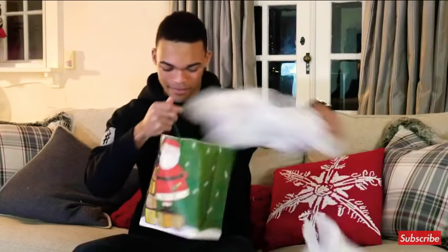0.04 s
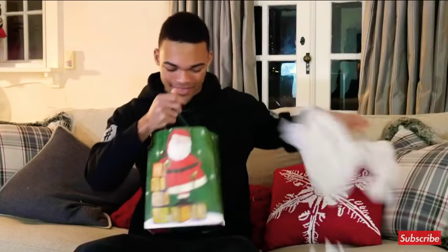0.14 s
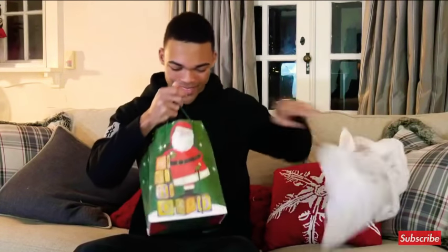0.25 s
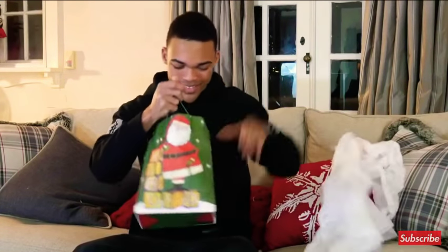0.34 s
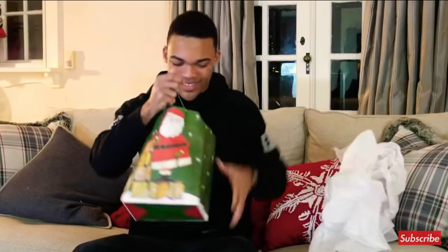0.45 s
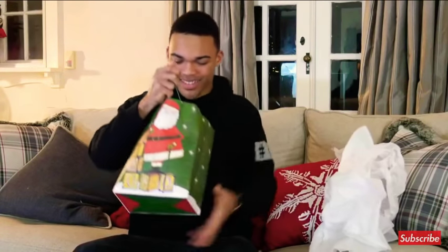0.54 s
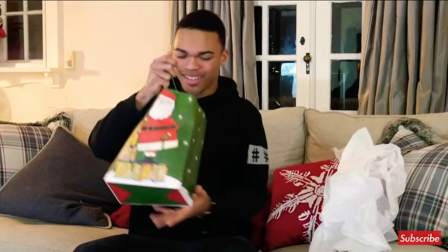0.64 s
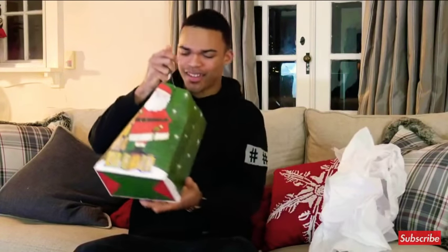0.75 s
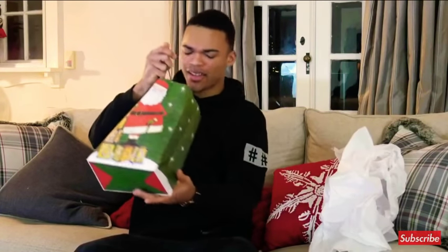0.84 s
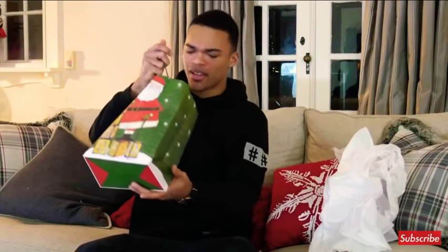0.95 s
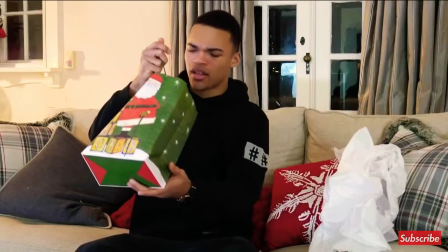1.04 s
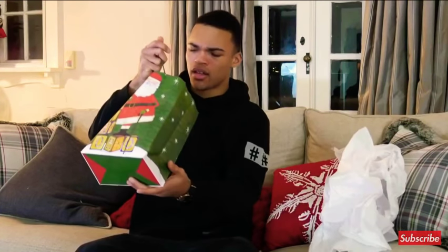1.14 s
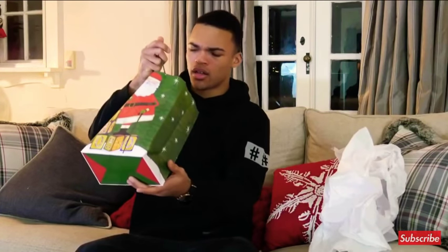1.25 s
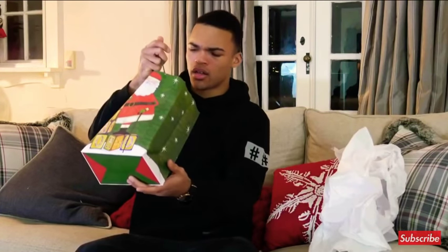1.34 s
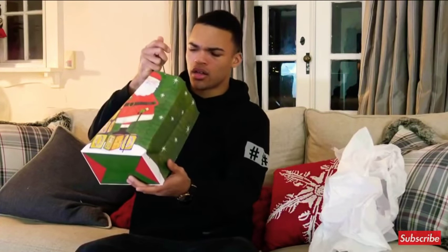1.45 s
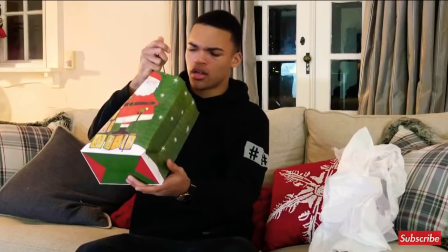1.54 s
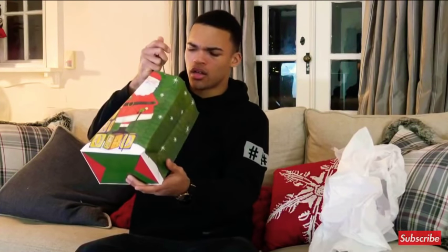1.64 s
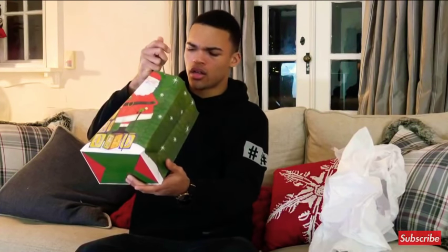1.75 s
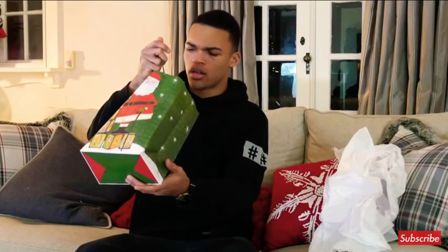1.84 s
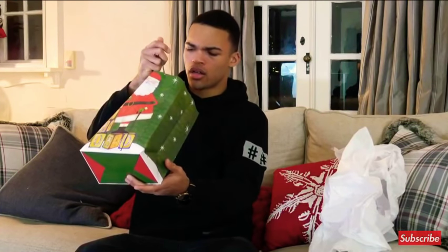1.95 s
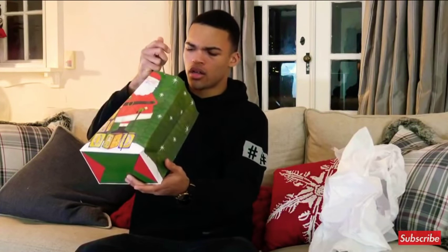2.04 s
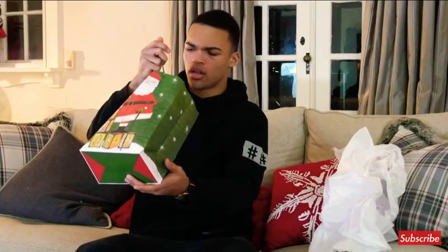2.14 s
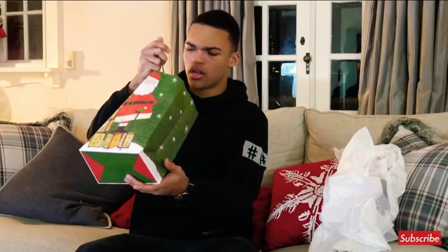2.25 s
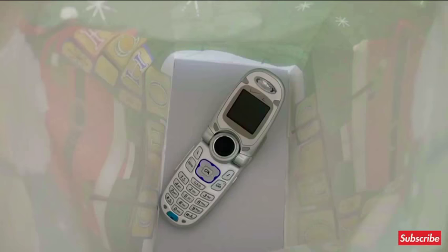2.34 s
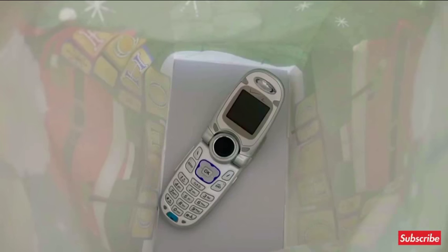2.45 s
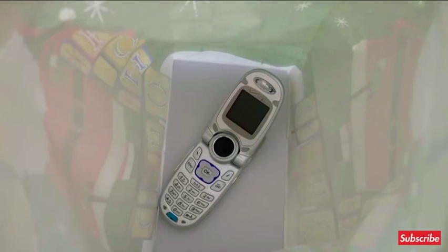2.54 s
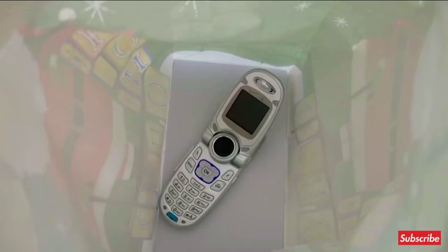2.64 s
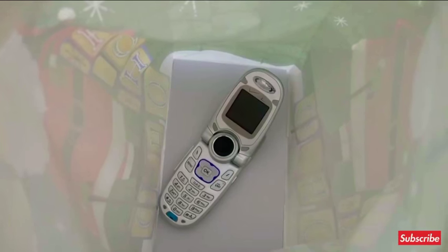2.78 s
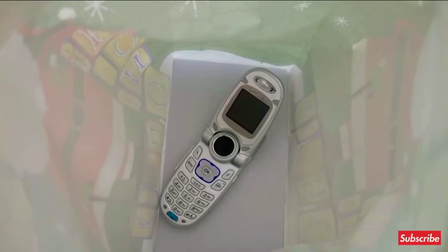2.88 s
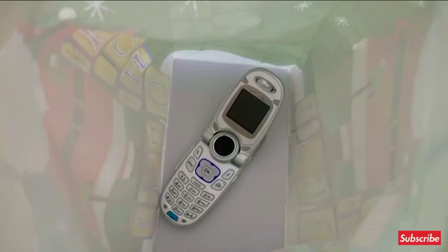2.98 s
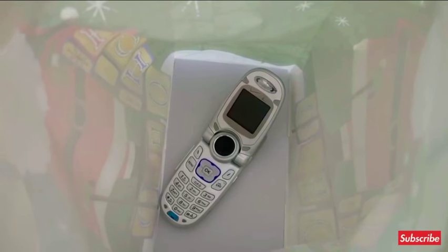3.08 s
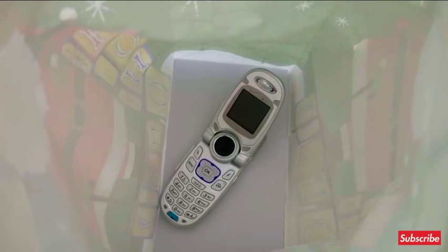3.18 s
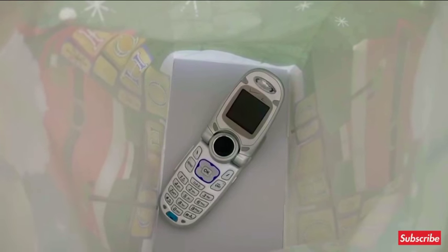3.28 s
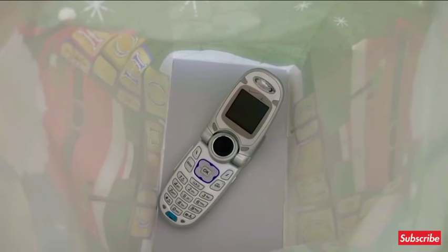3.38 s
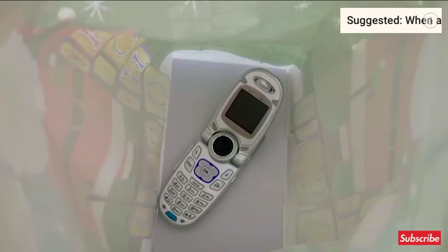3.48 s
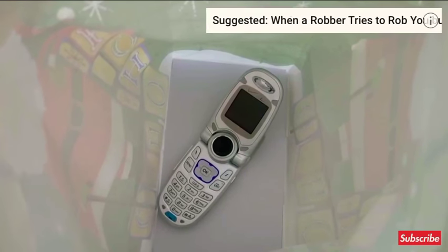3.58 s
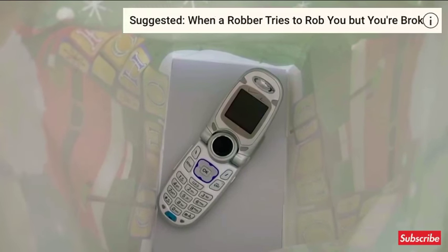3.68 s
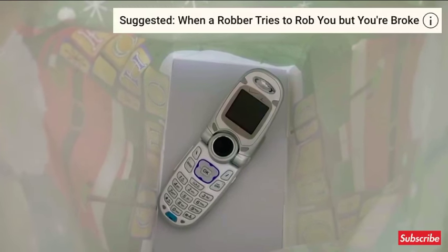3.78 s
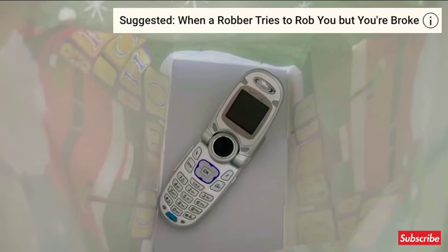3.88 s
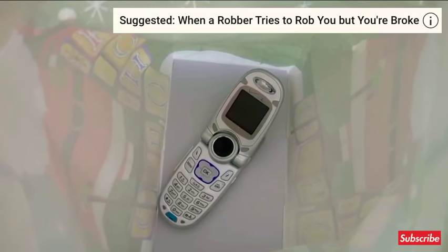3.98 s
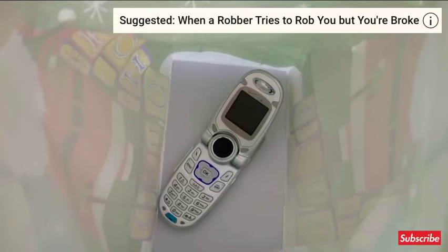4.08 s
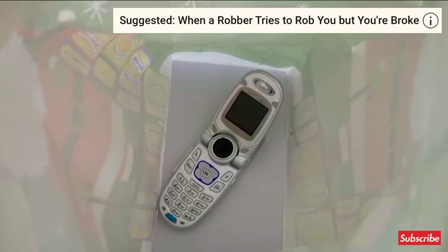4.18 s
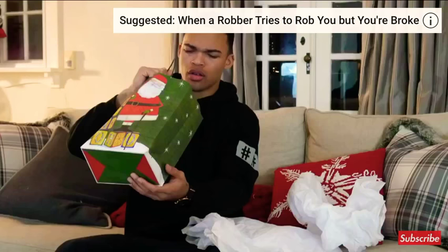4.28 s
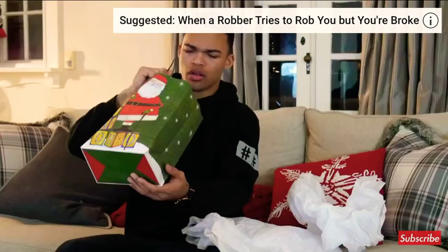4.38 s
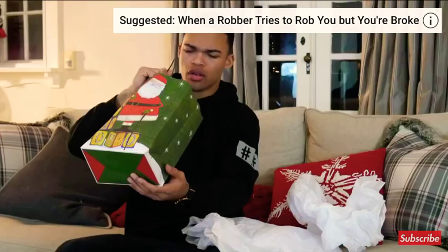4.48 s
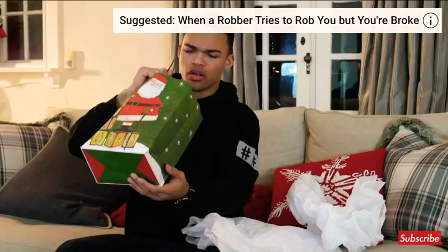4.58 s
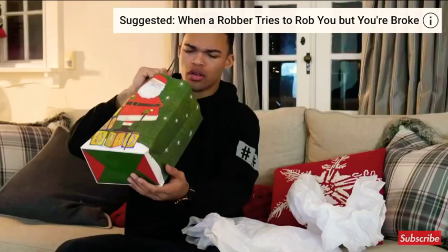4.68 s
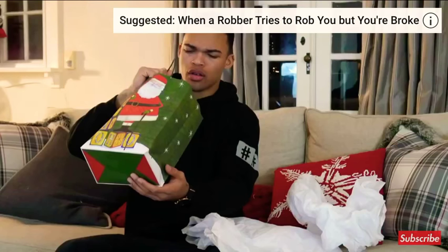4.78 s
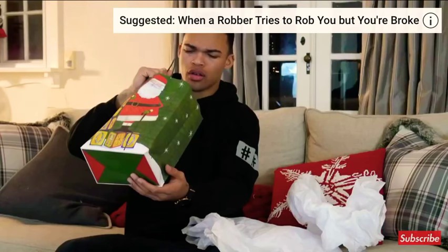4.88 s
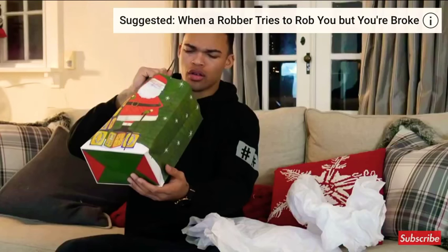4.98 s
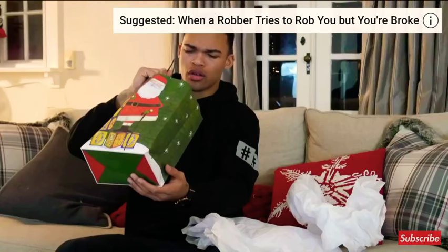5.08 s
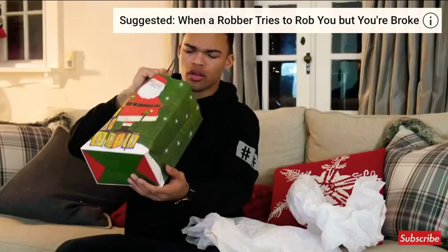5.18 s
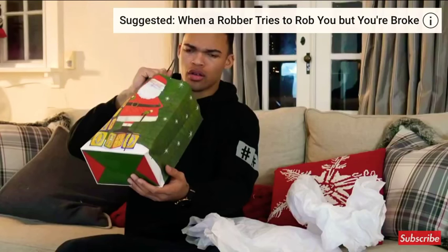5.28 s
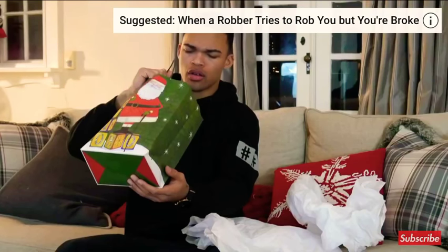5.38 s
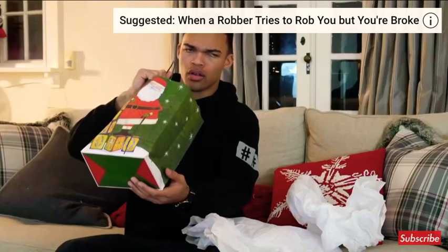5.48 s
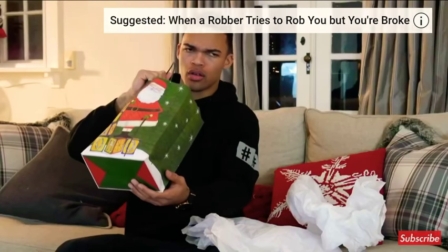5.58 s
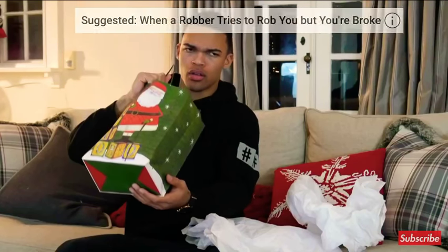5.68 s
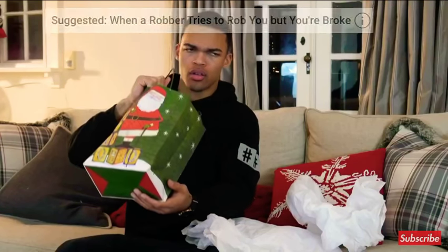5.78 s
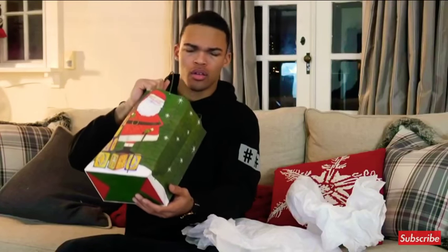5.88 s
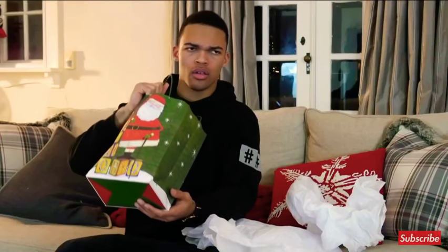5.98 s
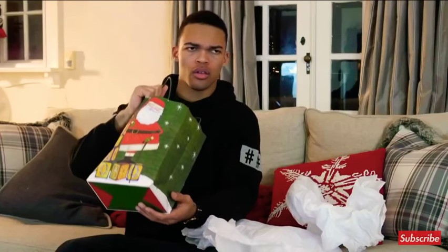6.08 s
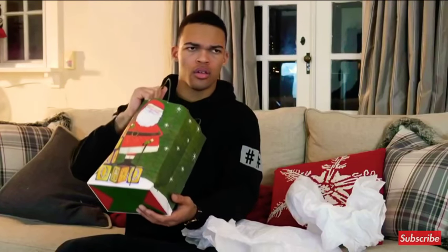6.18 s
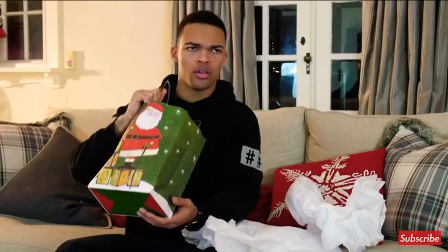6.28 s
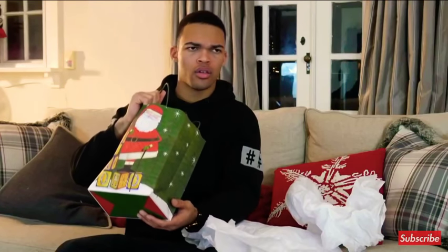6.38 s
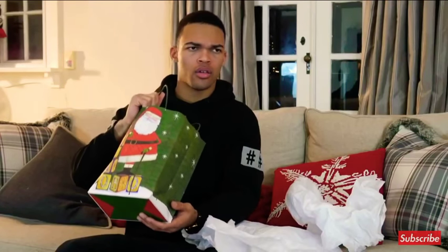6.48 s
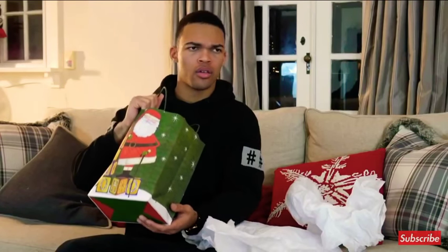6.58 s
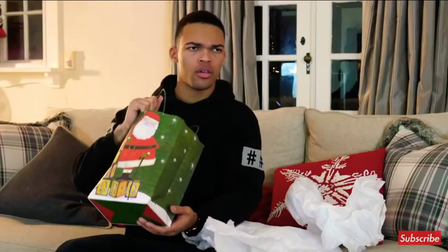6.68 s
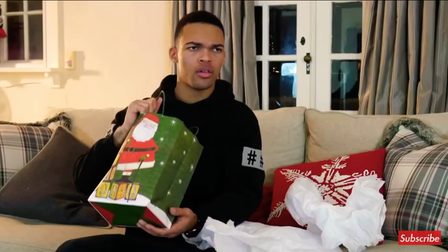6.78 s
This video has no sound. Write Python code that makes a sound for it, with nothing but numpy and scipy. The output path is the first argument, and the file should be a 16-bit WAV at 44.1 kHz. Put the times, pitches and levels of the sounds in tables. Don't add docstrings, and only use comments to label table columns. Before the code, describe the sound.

Loud crisp tissue paper crackles out of a card gift bag, a hand catches the bag, then faint crinkles over a quiet humming room.

```python
import sys
import numpy as np
from scipy import signal
from scipy.fft import rfft, irfft, next_fast_len
from scipy.io import wavfile
from scipy.ndimage import uniform_filter1d, map_coordinates

SR = 44100
rng = np.random.default_rng(int(sys.argv[2]) if len(sys.argv) > 2 else 0)


def bounce(signal):
    frames = np.transpose(np.atleast_2d(signal))
    limited = np.clip(frames, -1, 1)
    pcm = np.round(limited * 32767).astype(np.int16)
    wavfile.write(sys.argv[1], SR, pcm)


def field_ratio(decibels):
    return 10 ** (np.asarray(decibels, dtype=float) / 20)


N = 301203

# [t/s, peak level/dB, f/Hz,
# after-rustle/s]
CREASE_SNAPS = [(0.392, -19, 3630, 0.086), (0.8043, -32, 10300, 0.041), (1.1015, -39.5, 3900, 0.046),
                (1.155, -43.5, 5280, 0.055), (1.2, -48, 3650, 0.051), (1.276, -39.5, 7220, 0.043),
                (1.3217, -36.5, 11100, 0.033), (1.3984, -51, 3650, 0.06), (1.444, -43, 5050, 0.097),
                (1.4711, -43, 6550, 0.053), (1.5423, -40.5, 9900, 0.06), (1.5723, -41.5, 3400, 0.044),
                (1.704, -51.5, 9700, 0.081), (1.747, -41.5, 9970, 0.073), (1.7708, -39.5, 3740, 0.12),
                (1.7894, -45, 3830, 0.06), (1.9948, -46, 4040, 0.054), (2.08, -47.5, 4800, 0.18),
                (2.15, -51, 8600, 0.06), (2.175, -43, 5940, 0.029), (2.2358, -45, 4550, 0.044),
                (2.3064, -50, 4200, 0.06), (2.3277, -47, 9800, 0.091), (2.3998, -48, 7440, 0.06),
                (2.4464, -49, 6650, 0.11), (2.5157, -45, 6950, 0.034), (2.5311, -46, 10200, 0.02),
                (2.5566, -44, 11000, 0.04),
                (2.8462, -45, 10160, 0.06), (3.1053, -45.5, 4000, 0.06), (3.9221, -56, 6960, 0.06),
                  (4.5896, -47, 10000, 0.079), (4.6747, -53, 10400, 0.051), (4.7207, -53, 7080, 0.06),
                  (4.794, -47, 10800, 0.041), (4.817, -55, 3600, 0.06), (5.031, -47.5, 9700, 0.097),
                  (5.134, -53, 6660, 0.046), (5.1774, -49, 6300, 0.034), (5.274, -54.5, 3700, 0.049),
                  (5.3239, -48.5, 9800, 0.021), (5.4231, -45.5, 10800, 0.036), (5.5399, -55, 5670, 0.06),
                  (5.6218, -51.5, 4700, 0.11), (5.8175, -48, 5800, 0.06), (5.8377, -59, 5960, 0.06),
                (5.8845, -45, 5430, 0.032), (5.9034, -46, 10500, 0.035), (5.915, -49, 8120, 0.027),
                  (6.0182, -35, 8400, 0.034), (6.104, -52, 7600, .03), (6.16, -51, 10500, 0.036),
                  (6.253, -44, 5640, 0.037), (6.3744, -43.5, 13100, .03), (6.4308, -46, 7700, .03),
                  (6.4827, -45, 9390, 0.067), (6.5686, -40.5, 11500, 0.013), (6.6548, -42, 9900, 0.034),
                  (6.7394, -52, 5200, .04), (6.759, -45, 4650, 0.044)]
ALL_SNAPS = CREASE_SNAPS
# [t/s, peak level/dB, f/Hz]
FINGER_TICKS = [(1.0095, -42, 2200), (1.022, -31, 1980), (1.2888, -47, 1790), (1.996, -53.5, 1340),
                (3.105, -58, 1750), (3.7304, -60, 1310), (3.922, -58, 2100), (4.5915, -55, 2400),
                (6.2535, -46.5, 2670), (6.7424, -45, 2050), (6.763, -43, 2870)]
# [t/s, level/dB]
HAND_EFFORT = [(0, -30), (.23, -28.5), (.38, -39), (.5, -38), (.63, -42.5), (.77, -53.5), (.86, -45.5),
               (1.09, -59.5), (1.25, -64), (1.73, -72), (2.17, -70.5), (2.57, -70), (4.5, -72.5),
               (5.76, -72.5), (5.9, -63.5), (6.26, -60.5), (6.53, -60), (6.83, -59.5)]
# [f/Hz, level per Hz/dB]
TISSUE_COLOUR = [(710, -43), (1200, -1.5), (1670, -3), (1820, -1.5), (4580, -4.5), (6230, -4.5),
                 (7950, -7.5), (9940, -9), (13500, -13.5), (15200, -18.5)]
CARD_COLOUR = [(35, -53), (60, -29), (150, -3.5), (282, -4), (454, 0), (838, -0.5), (1100, -5),
               (1830, -6.5), (3500, -14), (4550, -24), (7700, -120)]

# [t/s, peak level/dB, rattle/s]
TUG_BLOWS = [
    (0.001, -26, 0.022),
    (0.036, -24, 0.024),
]
# [t/s, peak level/dB, rattle/s]
CATCH_BLOWS = [
    (0.579, -28.5, 0.028),
    (0.614, -23, 0.041),
]
# [t/s, peak level/dB, rattle/s]
SHIFT_BLOWS = [
    (0.855, -35, 0.02),
    (0.959, -42.5, 0.027),
    (1.009, -33, 0.02),
    (1.469, -53, 0.017),
]
# [t/s, peak level/dB, rattle/s]
KNOCK_BLOWS = [
    (4.816, -38.5, 0.04),
    (5.298, -56.5, 0.03),
    (5.834, -55, 0.026),
]
# [f/Hz, level per Hz/dB]
CATCH_COLOUR = [(88, -47), (150, -14.5), (342, -9), (580, -7.5), (646, -2.5), (882, -2.5), (1070, -4),
                (1140, -15), (1270, -4), (1640, -5.5), (1960, -13), (2600, -12), (3800, -20.5), (4940, -19),
                (8360, -120)]
SHIFT_COLOUR = [(71, -41), (120, -4), (272, -9), (358, 2.5), (435, -9), (627, 1), (916, -3.5), (973, -3.5),
                (2140, -10), (2530, -19), (4500, -22.5), (5850, -48), (9900, -120)]
KNOCK_COLOUR = [(71, -60), (120, -32), (243, -5.5), (559, -3), (658, 2.5), (726, 1), (815, -12.5),
                (1020, -1.5), (1290, -14), (1730, -8.5), (2040, -16.5), (2400, -16), (6000, -44.5),
                (7800, -67), (13200, -120)]
# [f/Hz, level/dB, t60/s]
BAG_MODES = [(360, -3, 0.17), (545, -16, 0.22), (650, -6.5, 0.12), (727, -1, .3), (999, -2.5, 0.17),
             (1230, -18, .2), (1720, -9, 0.094), (1880, -22, .15), (2350, -3, 0.11)]

# [delay t/s, level/dB]
WALL_ECHOES = [(.0065, -2.5), (.013, -11), (.0205, -14), (.028, -14)]
# [f/Hz, t60/s]
ROOM_DECAY = [(200, 0.69), (600, 0.43), (1500, 0.33), (4000, 0.32), (12000, 0.035)]

# [f/Hz, level/dB]
MACHINE_LINES = [(118.4, -77), (236.9, -70.5), (263.8, -67.5), (360.7, -72.5), (409.1, -82.5),
                 (769.8, -104), (839.8, -78), (936.7, -85), (979.8, -83)]
MOTOR_LINES = [(84, -78), (106, -79), (121, -74.5), (142, -72.5), (168, -82), (188, -77), (226.5, -75.5),
               (250, -76), (268, -72.5), (293, -91), (310, -73.5), (331, -71), (350, -88), (483, -101),
               (810, -81), (930, -78), (1022, -88.5)]
# (f/Hz, width/Hz, level/dB)
BEARING_WHINE = (2640, 110, -81.5)
# [f/Hz, level per Hz/dB]
USUAL_AIR = [(15, -52), (25, -30), (104, 0), (187, -9), (258, -5.5), (311, -8), (365, -8.5), (441, -10),
             (625, -16), (934, -9), (1220, -25.5), (2590, -21), (3770, -34), (10700, -36), (15200, -31)]
OTHER_AIR = [(15, -70), (25, -13), (48, -36), (75, -8.5), (203, -7.5), (320, -1), (441, -20), (478, -13),
             (714, -22), (795, -11.5), (960, -16.5), (1130, -24.5), (2590, -28), (3380, -30),
             (15200, -37.5)]
# [t/s, share of the other moment]
OTHER_MOMENT = [
    (2.559, 0),
    (2.58, 1),
    (4.48, 0.84),
    (4.5, 0),
]

# (f/Hz, width/Hz, level/dB)
MIC_PEAK = (10400, 1840, 4.64)
# (f/Hz, width/Hz, depth 0-1)
MIC_DIP = (7900, 100, 0.62)


def paper():
    crackle_db, flex_db = effort()
    thin = 0.58 * crinkle(count=14000, low_hz=2220, high_hz=15800, spread_db=1.5, cycles=1.15, size=80)
    thin = patchy(thin + 1.46 * rng.standard_normal(N), depth_db=0.5)
    thin = field_ratio(0.62 * wobble(60)) * thin
    gentle = np.clip((-41.5 - crackle_db) / 15, 0, 1)
    apart = crinkle(count=2200, low_hz=3050, high_hz=15300, spread_db=4.5, cycles=2.0, size=120)
    thin = thin + 0.5 * gentle * apart
    stiff = 0.5 * crinkle(count=6000, low_hz=295, high_hz=3500, spread_db=-1.0, cycles=2.1, size=256)
    stiff = patchy(stiff + 1.28 * rng.standard_normal(N), depth_db=1.2)
    stiff = field_ratio(1.2 * wobble(35)) * stiff
    tissue = field_ratio(crackle_db - 0.03) * tinted(thin, TISSUE_COLOUR)
    card = field_ratio(flex_db - 3.0) * tinted(stiff, CARD_COLOUR)
    return tissue + card


def effort():
    hands = field_ratio(2 * curves(HAND_EFFORT, -140)[0])
    after = dying([(s, db, fade) for s, db, hz, fade in ALL_SNAPS])
    jolts = dying([(s, db - 8.5, 0.077) for s, db, rattle in TUG_BLOWS + CATCH_BLOWS])
    t = np.arange(N) / SR
    present = (t < (OTHER_MOMENT[0][0] + OTHER_MOMENT[1][0]) / 2) | (t > OTHER_MOMENT[2][0])
    tissue = hands + field_ratio(2 * -20) * after
    card = field_ratio(2 * -1.5) * hands + field_ratio(2 * -26.5) * after + jolts
    return [10 * np.log10(present * power + 1e-14) for power in (tissue, card)]


def dying(events):
    out, t = np.zeros(N + SR), np.arange(SR // 2) / SR
    rise = 1 - np.exp(-t / 0.0023)
    for s, db, fade in events:
        out[round(s * SR):][:len(t)] += rise * field_ratio(2 * (db - 10 * t / max(fade, 1 / 200)))
    return out[:N]


def crinkle(count, low_hz, high_hz, spread_db, cycles, size):
    when, pitch, chance = rng.random((count, 3)).T
    hz = low_hz * (high_hz / low_hz) ** pitch
    gain = hz * field_ratio(-spread_db * np.log(chance + 1 / 100))
    return unit(grains(when * N / SR, hz, gain, cycles, size))


def patchy(x, depth_db):
    z = signal.stft(x, nperseg=256)[2]

    def field(size):
        across_pitch = uniform_filter1d(rng.standard_normal(z.shape), size=size, axis=0)
        return unit(uniform_filter1d(across_pitch, size=size, axis=1))

    swell_db = 2 * field(size=22)
    return signal.istft(z * field_ratio(depth_db * field(size=7) + swell_db), nperseg=256)[1][:N]


def snaps():
    s, db, hz, _ = np.transpose(ALL_SNAPS)
    place, depth = rng.random((len(s), 2)).T
    ring = grains(s, hz, field_ratio(db - 7.5), 6.0, size=200)
    knock_db = db - 17 + 7 * (2 * depth - 1) - 3
    knock = grains(s, 1270 + 2030 * place, field_ratio(knock_db), 3.7, size=200)
    tick_s, tick_db, tick_hz = np.transpose(FINGER_TICKS)
    tick = grains(tick_s, tick_hz, field_ratio(tick_db + 1.5), 3.0, size=400)
    return ring + knock + tick + clicks(s, db, hz)


def clicks(s, db, hz):
    size = 130
    u = np.arange(size) / SR / 0.00035
    burst = rng.standard_normal((len(s), size)) * u * np.exp(1 - u) * field_ratio(db - 8)[:, None]
    octaves = np.log2((np.fft.rfftfreq(size, 1 / SR) + 1) / hz[:, None])
    burst = irfft(rfft(burst) / (1 + (octaves / 3.3) ** 4), size)
    at = np.round(s * SR).astype(int)[:, None] + np.arange(size)
    click = np.bincount(at.ravel(), burst.ravel(), N + SR)[:N]

    def sheet(f):
        return field_ratio(along(TISSUE_COLOUR, f) + 11.5) * f ** 2 / (f ** 2 + 4200 ** 2)

    return filtered(click, sheet)


def taps():
    out, t = np.zeros(N + SR), np.arange(SR // 8) / SR
    onset = 1 - np.exp(-t / 0.00026)
    contact = 2.25 * np.exp(-t / 0.003)
    groups = ((CATCH_BLOWS, CATCH_COLOUR), (SHIFT_BLOWS, SHIFT_COLOUR), (KNOCK_BLOWS + TUG_BLOWS, KNOCK_COLOUR))
    for blows, colour in groups:
        for s, db, rattle in blows:
            shape = onset * (1 / (1 + (t / rattle) ** 4) + contact)
            noise = tinted(rng.standard_normal(len(t)), colour)
            out[round(s * SR):][:len(t)] += field_ratio(db - 13.5) * shape * noise
    return out[:N]


def hollow():
    out, t = np.zeros(N + SR), np.arange(SR // 4) / SR
    for s, db, rattle in KNOCK_BLOWS + TUG_BLOWS + SHIFT_BLOWS[2:]:
        ring = np.zeros(len(t))
        for hz, level, t60 in BAG_MODES:
            decay_db = -60 * t / min(t60, 0.13)
            ring += field_ratio(level + rng.normal(0, 1.2) + decay_db) * np.sin(2 * np.pi * hz * t)
        out[round(s * SR):][:len(t)] += field_ratio(db - 16) * ring
    return out[:N]


def room(x, wet_db):
    out, step, cut = np.pad(x, (0, SR)), SR // 3, round(OTHER_MOMENT[1][0] * SR)
    for delay, db in WALL_ECHOES:
        out[round(delay * SR):][:N] += field_ratio(db) * x
    for start in range(0, N, step):
        hz, t, z = signal.stft(rng.standard_normal(SR // 2), SR, nperseg=256)
        decay = field_ratio(-60 * t / along(ROOM_DECAY, hz)[:, None])
        tail = signal.istft(z * decay, SR, nperseg=256)[1]
        wet = signal.fftconvolve(x[start:start + step], tail / np.linalg.norm(tail))
        if start < cut:
            wet = wet[:cut - start]
        out[start:][:len(wet)] += field_ratio(wet_db) * wet
    return out[:N]


def room_tone():
    share = np.clip(curves(OTHER_MOMENT, 0)[0], 0, 1)
    usual = tones(MACHINE_LINES, unsteady_db=-1.5, drift=0.94, rate=10.0)
    usual = usual + field_ratio(-66.5) * tinted(rng.standard_normal(N), USUAL_AIR)
    other = tones(MOTOR_LINES, unsteady_db=3.0, drift=0.61, rate=6.0)
    other = other + field_ratio(-62.5) * tinted(rng.standard_normal(N), OTHER_AIR)
    hz, width, whine_db = BEARING_WHINE
    whine = unit(filtered(rng.standard_normal(N), lambda f: resonance(f, hz, width) ** 2))
    return np.sqrt(1 - share) * usual + np.sqrt(share) * other + field_ratio(whine_db) * whine


def tones(lines, unsteady_db, drift, rate):
    t, out = np.arange(N) / SR, np.zeros(N)
    for hz, db in lines:
        strength = field_ratio(db + 2.5 + unsteady_db * wobble(rate))
        out += strength * np.sin(2 * np.pi * hz * t + drift * wobble(rate))
    return out


def resonance(f, hz, width):
    return 1j * f * width / (hz * hz - f * f + 1j * f * width)


def grains(s, hz, gain, cycles, size):
    t = np.arange(size) / SR
    decay = np.exp(-t * (hz / cycles)[:, None])
    wave = gain[:, None] * np.sin(2 * np.pi * hz[:, None] * t) * decay
    at = np.round(s * SR).astype(int)[:, None] + np.arange(size)
    return np.bincount(at.ravel(), wave.ravel(), N + SR)[:N]


def unit(x):
    return x / np.sqrt(np.mean(x ** 2) + 1e-20)


def along(points, hz):
    f, v = np.transpose(points)
    return np.interp(np.log(hz + 1), np.log(f + 1), v)


def curves(rows, outside):
    s, *cols = np.transpose(rows)
    return np.array([np.interp(np.arange(N) / SR, s, c, outside, outside) for c in cols])


def wobble(rate):
    coarse = np.arange(0, N + 64, 64)
    knots = rng.standard_normal(int(N * rate / SR) + 4)
    return np.interp(np.arange(N), coarse, map_coordinates(knots, [coarse * rate / SR]))


def filtered(x, response):
    m = next_fast_len(len(x) + SR // 2)
    return irfft(rfft(x, m) * response(np.fft.rfftfreq(m, 1 / SR)), m)[:len(x)]


def tinted(x, spectrum):
    return unit(filtered(x, lambda hz: field_ratio(along(spectrum, hz))))


def scene():
    creases = room(snaps(), wet_db=-8)
    blows = filtered(taps() + hollow(), lambda f: f ** 4 / (f ** 4 + 110 ** 4))
    mono = paper() + creases + room(blows, wet_db=0.5) + room_tone()
    return np.array([mono, mono])


def low_pass(x):
    return signal.sosfilt(signal.butter(12, 15350, fs=SR, output="sos"), x)


def record(dry):
    peak_hz, peak_width, peak_db = MIC_PEAK
    dip_hz, dip_width, dip_depth = MIC_DIP

    def bell(f, hz, width):
        return 1 / (1 + ((f - hz) / width) ** 2)

    def microphone(f):
        peak = field_ratio(peak_db * bell(f, peak_hz, peak_width))
        dip = 1 - dip_depth * bell(f, dip_hz, dip_width)
        return peak * dip / (1 + (f / 15400) ** 60)

    mono = filtered(dry[0], microphone)
    mono = mono / (1 + np.abs(mono / 0.19) ** 4) ** (1 / 4)
    return low_pass(np.array([mono, mono]))


dry = scene()
out = record(dry)
bounce(out)
```